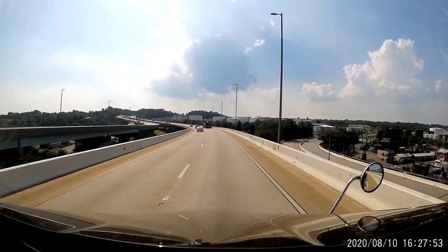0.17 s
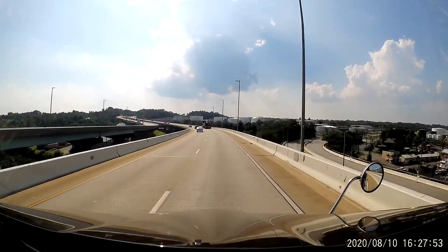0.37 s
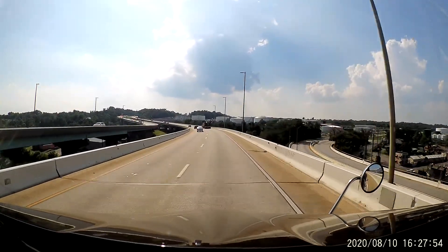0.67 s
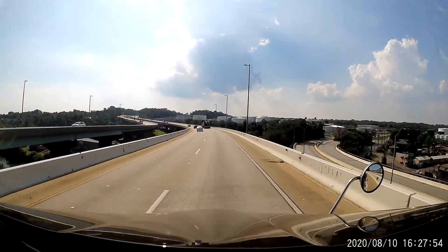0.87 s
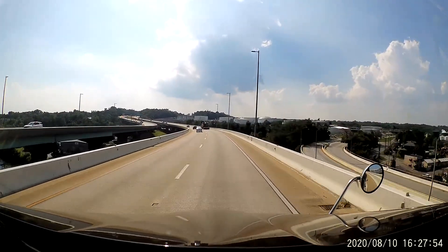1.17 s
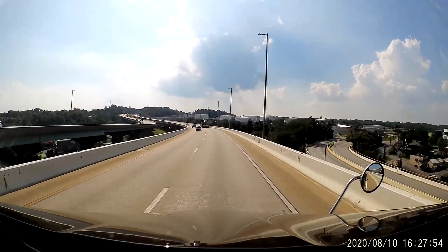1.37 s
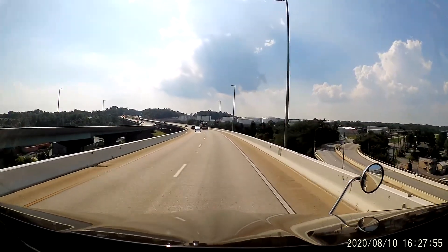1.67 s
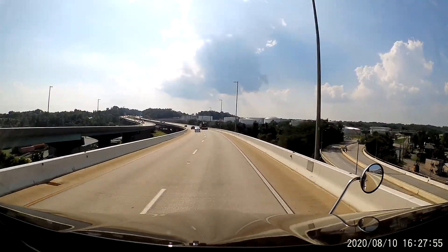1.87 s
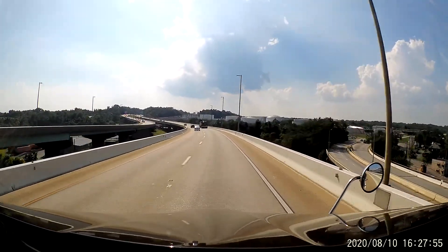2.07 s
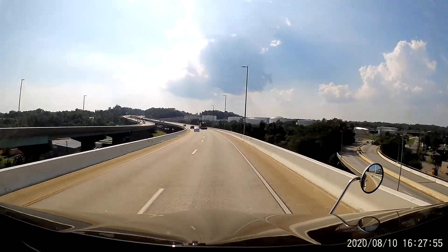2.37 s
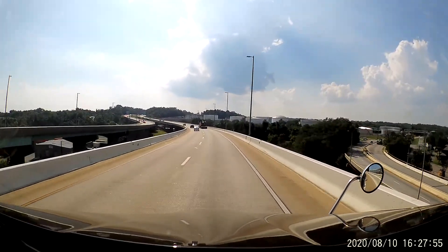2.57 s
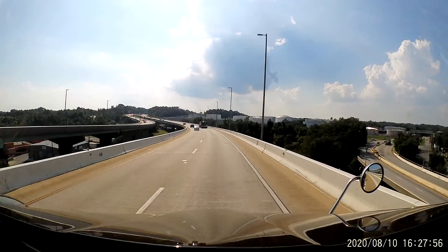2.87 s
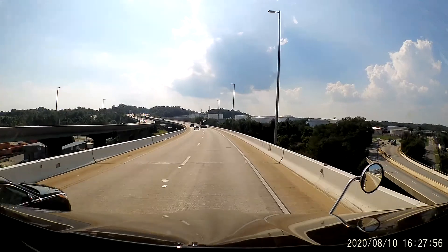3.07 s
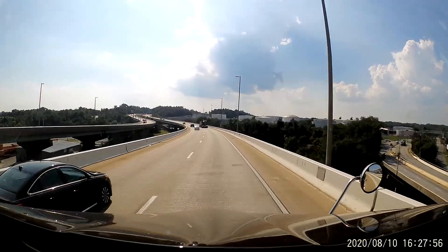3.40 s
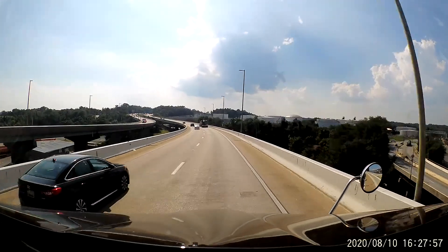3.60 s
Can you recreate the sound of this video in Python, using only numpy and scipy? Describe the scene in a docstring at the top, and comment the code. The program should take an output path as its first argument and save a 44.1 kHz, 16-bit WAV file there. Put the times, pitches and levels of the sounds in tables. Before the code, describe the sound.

Steady engine and deep tyre rumble inside a truck cab on an elevated concrete highway, with wavering low booms, soft joint thumps, light trim ticks and faint wind, heard through a slightly dull dash microphone.

```python
"""Inside a truck cab

A truck cruises over an elevated concrete road, slowly gaining speed. Tyre roar and wind are coloured noise;
engine and driveline hum as sine waves tied to one rotation; two panels boom at their own bending pitch.
Bumps ring the body, loose trim rattles in bursts of ticks, and wheels thump on joints as fading tones.
A dash microphone overloads softly, whines faintly and samples at 16 kHz."""
import sys
import numpy as np
from scipy import signal
from scipy.fft import rfft, irfft
from scipy.io import wavfile

SR = 44100
rng = np.random.default_rng(int(sys.argv[2]) if len(sys.argv) > 2 else 0)


def gain_from_db(level_db):
    """Turn a decibel level (scalar or array-like) into a linear amplitude factor."""
    decades = np.asarray(level_db, float) / 20
    return 10 ** decades


def bounce(signal):
    """Save signal as a 16-bit WAV file at the path given by the first command-line argument."""
    frames = np.transpose(np.atleast_2d(signal))
    limited = np.clip(frames, -1, 1)
    pcm = np.round(limited * 32767).astype(np.int16)
    wavfile.write(sys.argv[1], SR, pcm)


N = 164934  # samples in the scene


def rms_one(x):
    """Scale to rms 1."""
    return x / np.sqrt(np.mean(x ** 2) + 1e-20)


def in_time(rows):
    """Join the points of a table by straight lines in time, one curve per column."""
    s, *columns = np.transpose(rows)
    return [np.interp(np.arange(N) / SR, s, column) for column in columns]


def drift(rate_hz):
    """Slow random wandering around zero, with a typical size of 1; a higher rate wanders faster."""
    # computed at every 40th sample, then joined by lines
    r = np.exp(-2 * np.pi * rate_hz * 40 / SR)
    noise = rng.standard_normal(N // 40 + 2002)
    slow = signal.lfilter([1], [1, -2 * r, r * r], noise)[2000:]  # skip the filter's start
    slow = rms_one(slow - slow.mean())
    return np.interp(np.arange(N) / 40, np.arange(len(slow)), slow)


def coloured(spectrum, patchy_db, flutter_hz):
    """Noise shaped by a spectrum and the cab, with octave bands that flicker partly together; rms 1."""
    # narrow resonances of cab air and panels: (frequency [Hz], width [Hz], lift [dB])
    resonances = [(155, 20, 1), (192.8, 4.6, 4.5), (228, 6.5, 1.5), (255, 4.7, 0.5), (363.5, 5.9, 0.5),
                  (421, 9.6, 2.5), (478, 14, 4.5), (581, 13, 2.5), (618, 12, 3), (684, 29, 5.5),
                  (780, 16, 4.5), (938, 40, 3.5), (1169, 30, 1.5), (1298, 12, 5), (1360, 27, 3),
                  (1835, 67, 2.5), (2210, 14, 4), (2610, 40, 2.5), (4240, 150, 5.5), (4560, 33, 5),
                  (5500, 250, 2)]
    hz, db = np.transpose(spectrum)
    f = np.maximum(np.arange(N // 2 + 1) * SR / N, 1)
    octave = np.log2(f)
    shape_db = np.interp(octave, np.log2(hz), db, left=-90, right=-90)
    for peak_hz, width_hz, lift_db in resonances:
        shape_db = shape_db + lift_db / (1 + (2 * (f - peak_hz) / width_hz) ** 2)
    shaped = rfft(rng.standard_normal(N)) * gain_from_db(shape_db)
    together, out = drift(flutter_hz), 0
    for centre in np.arange(3, 15):  # overlapping bands from 8 Hz to 16 kHz
        band = irfft(shaped * np.clip(1 - np.abs(octave - centre), 0, 1), N)
        out = out + band * gain_from_db(patchy_db * (1.2 * together + drift(flutter_hz)))
    return rms_one(out)


def wind():
    """Wind hissing past the glass: flickering noise, mostly treble, that slowly changes in level."""
    # tone colour: (frequency [Hz], relative level per Hz [dB])
    spectrum = [(1060, -35.5), (1800, -4), (2950, -9), (3580, -7), (4000, -11.5), (5000, -14.5),
                (5940, -16), (6890, -15.5), (7400, -15.5), (8100, -20)]
    # loudness: (time [s], level [dB rms])
    loudness = [(0.0, -50), (1.2, -49), (1.54, -47), (1.79, -48), (3.74, -46)]
    return gain_from_db(in_time(loudness)[0]) * coloured(spectrum, patchy_db=0.43, flutter_hz=12.0)


def rattles():
    """Loose trim rattles: short swells of dense ticks in a broad band, with smaller ones at random."""
    # larger rattles: (time [s], level [dB], length [s], centre [Hz]); the whole swell lasts 1.6 lengths
    larger = [(.076, -56, 0.0096, 7240), (.123, -54.5, 0.0089, 6990), (.176, -57.5, 0.0072, 6500),
              (.362, -55, .012, 6900), (.423, -49.5, .022, 3900), (.427, -54, 0.022, 6880),
              (.541, -50, 0.01, 7700), (.666, -52, 0.013, 5080), (.736, -51.5, 0.028, 6500),
              (.772, -52, 0.03, 5920), (1.42, -49.5, 0.008, 4200), (1.467, -42.5, .007, 6170),
              (1.475, -57, .012, 4460), (1.522, -49.5, 0.0075, 3900), (1.526, -46.5, 0.013, 6700),
              (1.530, -49.5, .009, 4680), (1.83, -54, 0.068, 5500), (2.298, -49, 0.014, 5140),
              (2.378, -46, .008, 3580), (2.447, -50, 0.007, 3390), (3.165, -47.5, .012, 3990),
              (3.28, -53.5, 0.026, 3780), (3.62, -50, 0.01, 5500)]
    width_octaves, ticks_per_s = 1.1, 3000
    small_db, small_per_s = -66, 25
    out = np.zeros(N + SR)
    draws = rng.random((200, 3))
    times = np.cumsum(-np.log(draws[:, 0] + 1e-9) / small_per_s)  # random waits add up
    small = []
    for s, a, b in zip(times, draws[:, 1], draws[:, 2]):
        if s < N / SR:
            # a few small ones come out louder; each has its own pitch
            small.append((s, small_db - 3 * np.log(a + .1), .008, 3000 * 2 ** (1.7 * b)))
    t = np.arange(4096) / SR
    for s, db, length, hz in list(larger) + small:
        swell = np.sin(np.pi * np.clip(t / (1.6 * length), 0, 1) ** .45) ** 2  # quick rise, slower fall
        tick_heights = 0.44 + 3 * (rng.random(len(t)) < ticks_per_s / SR)
        ticks = rng.standard_normal(len(t)) * tick_heights
        edges = [hz * 2 ** -(width_octaves / 2), min(hz * 2 ** (width_octaves / 2), 7900)]
        band = signal.butter(2, edges, "band", fs=SR, output="sos")
        burst = rms_one(signal.sosfilt(band, ticks)) * swell
        i = int(s * SR)
        out[i:i + len(t)] += gain_from_db(db) * burst
    return out[:N]


def bumps():
    """Bumps softly push each way the body can ring, at random; its pitch wavers as it fades."""
    # ringing modes: (frequency [Hz], relative level [dB], time to fade by 60 dB [s])
    modes = [(165, 1, .3), (193.1, -2, 0.46), (240, -5.5, .3), (257, -2.5, .3), (394, -7.5, 0.23),
             (476.5, -9, 0.27), (525, -10, 0.14), (605, -11, 0.26)]
    pushes_per_s, level_db, pitch_wander = 9, -30, .02  # rate per mode, rms of all, share of the pitch
    soft = np.exp(-1 / (.02 * SR))  # pushes build up over about 20 ms
    out = 0
    for hz, db, t60 in modes:
        pushes = (rng.random(N) < pushes_per_s / SR) * rng.random(N) + 1e-9
        fade = gain_from_db(-60 / (t60 * SR))
        ringing = signal.lfilter([1], [1, -fade], pushes)
        swell = signal.lfilter([1 - soft], [1, -soft], ringing)
        turns = np.cumsum(hz * (1 + pitch_wander * drift(4.04))) / SR
        out = out + gain_from_db(db) * swell * np.sin(2 * np.pi * turns)
    return gain_from_db(level_db) * rms_one(out)


def thumps():
    """A wheel drops on a joint: a soft push rings the floor, and the tone fades away."""
    # (time [s], level before the soft start [dB], frequency [Hz], time to fade by 60 dB [s])
    joints = [(.93, -19, 95, .3), (1.252, -10.5, 340, .22), (1.40, -16, 198, .3), (3.674, -5.5, 40, .2),
              (3.665, -14, 225, .2)]
    attack_s = .008
    t = np.arange(N) / SR
    out = 0
    for s, db, hz, t60 in joints:
        u = np.maximum(t - s, 0)  # time since this thump
        soft_start = 1 - np.exp(-u / attack_s)
        out = out - gain_from_db(db - 60 * u / t60) * soft_start * np.cos(2 * np.pi * hz * u)
    return out


def engine():
    """Engine and driveline hum: sines at multiples of one rotation, each following the load its own way."""
    # (time [s], base rate [Hz], load [dB])
    running = [(0, 47.2, -9), (.6, 47.65, -10), (1.2, 47.55, -14.5), (1.6, 47.5, -5), (2.4, 47.98, -8),
               (3.0, 48.48, -3.5), (3.74, 48.84, -2.5)]
    # (multiple of base rate, level at 0 dB load [dB rms], share of the load, level waver [dB])
    # a negative share makes that sine weaker as the load rises
    orders = [(.5, -40, -0.77, 3.5), (1, -31, 0.12, 1.5), (1.417, -34, -0.011, 2), (2, -45.5, -1.4, 1.5),
              (4, -37.5, 0.87, -1), (6.54, -26.5, .7, .8), (8.16, -39.5, 0.42, 4), (16.33, -44.5, 0.6, 3)]
    rate, load_db = in_time(running)
    turns = np.cumsum(rate) / SR
    out = 0
    for multiple, db, share, waver_db in orders:
        level = np.sqrt(2) * gain_from_db(db + share * load_db + waver_db * drift(2.2))
        unsteady = 0.03 * multiple ** .5 * drift(1.4)
        out = out + level * np.sin(2 * np.pi * (multiple * turns + rng.random() + unsteady))
    return out


def panel(shaking, wander_hz, rough_db):
    """A panel hums at its own slowly bending pitch; the road roughens pitch and level."""
    db, hz = in_time(shaking)
    turns = np.cumsum(hz + wander_hz * drift(5.64)) / SR
    return np.sqrt(2) * gain_from_db(db + rough_db * drift(8.1)) * np.sin(2 * np.pi * (turns + rng.random()))


def upper_panel():
    """The higher panel resonance, swelling as the road shakes it."""
    # (time [s], level before roughening [dB rms], pitch before wandering [Hz])
    shaking = [(0.0, -28.5, 338.4), (0.29, -32, 333), (0.35, -25, 331), (0.39, -37.5, 327),
               (0.47, -23, 327.4), (0.67, -27.5, 334.4), (0.69, -33.5, 335.7), (0.89, -26, 328.6),
               (1.01, -41, 326.7), (1.05, -28.5, 333.2), (1.24, -35.5, 332.2), (1.26, -25, 327.9),
               (1.37, -33, 337), (1.6, -27.5, 336.2), (2.06, -37, 329.5), (2.21, -26, 337),
               (2.37, -39, 333), (2.41, -26.5, 336.4), (2.74, -37.5, 325), (3.0, -29.5, 334.7),
               (3.47, -36.5, 326.1), (3.49, -26.5, 324.3), (3.59, -36.5, 336.6), (3.74, -27.5, 325.3)]
    return panel(shaking, wander_hz=3.5, rough_db=1.8)


def low_panel():
    """The deep booming panel resonance, swelling as the road shakes it."""
    # (time [s], level before roughening [dB rms], pitch before wandering [Hz])
    shaking = [(0.0, -30, 121.8), (0.12, -15, 126.5), (0.17, -27, 128.8), (0.23, -16.5, 124.2),
               (0.37, -17.5, 121.2), (0.42, -37, 120.7), (0.47, -24.5, 120.4), (0.6, -40.5, 124.5),
               (0.71, -16, 125.2), (0.83, -27.5, 122.6), (1.03, -26.5, 125), (1.29, -22, 127.2),
               (1.65, -31.5, 128.7), (1.84, -21, 125.9), (1.87, -36.5, 125.9), (2.03, -18, 123.9),
               (2.1, -35, 122.2), (2.13, -23.5, 121.8), (2.6, -28, 128.3), (2.71, -20, 127.1),
               (2.87, -30.5, 123.0), (2.94, -22, 123.9), (3.04, -45, 123.2), (3.07, -23, 121.5),
               (3.17, -41, 120.4), (3.24, -24, 119.6), (3.3, -34.5, 120.3), (3.45, -36.5, 127.2),
               (3.52, -24, 127.2), (3.65, -34, 127.9), (3.69, -23.5, 124.4), (3.74, -31, 124)]
    return panel(shaking, wander_hz=2.6, rough_db=2.3)


def tyre_roar():
    """Tyre roar through the body: mostly deep, flickering noise that slowly changes in level."""
    # tone colour: (frequency [Hz], relative level per Hz [dB])
    spectrum = [(8, -8.5), (20, -2), (31, 3), (40, -3.5), (58, -6), (90, -4.5), (110, -6.5), (135, -5.5),
                (165, -4.5), (184, -6), (200, -6), (225, -8), (255, -5.5), (288, -11), (310, -12),
                (348, -7.5), (372, -14), (400, -13), (470, -14.5), (600, -14), (690, -19), (740, -21),
                (810, -18.5), (880, -23.5), (1200, -24.5), (1400, -29), (2000, -37.5), (2900, -48)]
    # loudness: (time [s], level [dB rms])
    loudness = [(0, -21), (.6, -21.5), (1.2, -20), (1.8, -19.5), (2.4, -19.5), (3.0, -20), (3.4, -19),
                (3.74, -19)]
    return gain_from_db(in_time(loudness)[0]) * coloured(spectrum, patchy_db=0.49, flutter_hz=6.0)


def scene():
    """All sources added up as heard at the dash, in one channel."""
    background = wind() + rattles() + bumps() + thumps()
    return (background + engine() + upper_panel() + low_panel() + tyre_roar())[None]


def band_limit(x):
    """A steep low-pass at the top of the band."""
    return signal.sosfilt(signal.butter(12, 8820, fs=SR, output="sos"), x)


def record(dry):
    """Soft overload, faint whines, and 16 kHz sampling whose mirror image leaks above half its rate."""
    # thin steady whines of the recorder: (frequency [Hz], level before the treble roll-off [dB rms])
    whines = [(7663, -79), (7721.7, -77)]
    sampling_hz = 16000
    roll_db, roll_hz = -8.5, 8000  # loss reached at this frequency
    t = np.arange(N) / SR
    x = 0.89 * np.tanh(dry / 0.91)
    for hz, db in whines:
        x = x + np.sqrt(2) * gain_from_db(db) * np.sin(2 * np.pi * hz * t)
    f = np.arange(N // 2 + 1) * SR / N
    below = irfft(rfft(x) * (f < sampling_hz / 2), N)
    # flip the upper half of what is left to just above half the sampling rate
    top = irfft(rfft(below) * (f > sampling_hz / 4), N)
    flipped = 2 * top * np.cos(2 * np.pi * sampling_hz * t)
    mirror = irfft(rfft(flipped) * (f < sampling_hz), N)
    roll_off = gain_from_db(roll_db * (f / roll_hz) ** 12.0)
    mix = irfft(rfft(below + mirror) * roll_off, N)
    return band_limit(mix)


dry = scene()
out = record(dry)
bounce(out)
```